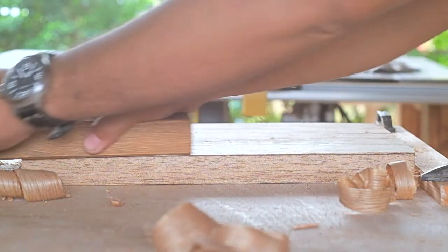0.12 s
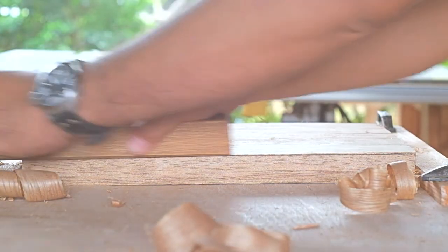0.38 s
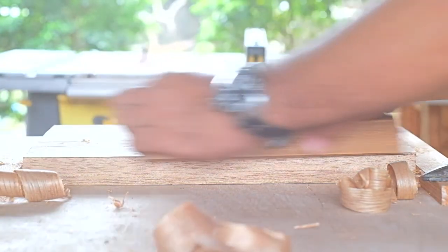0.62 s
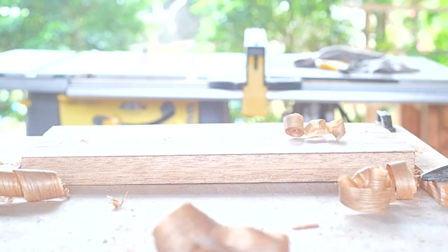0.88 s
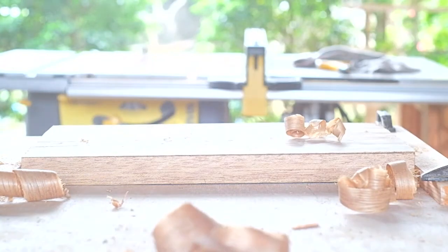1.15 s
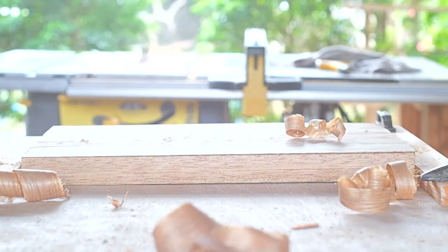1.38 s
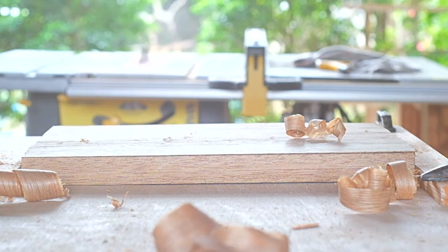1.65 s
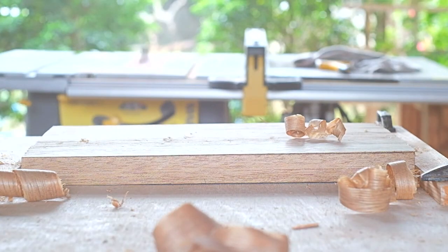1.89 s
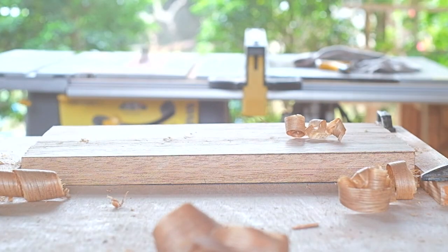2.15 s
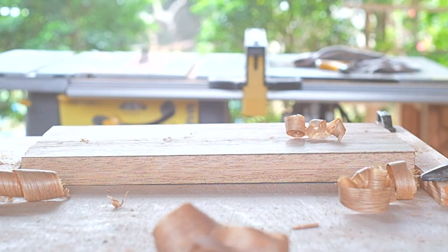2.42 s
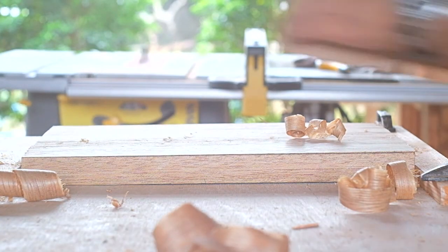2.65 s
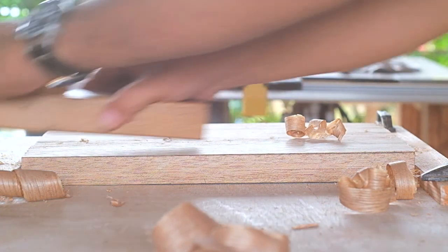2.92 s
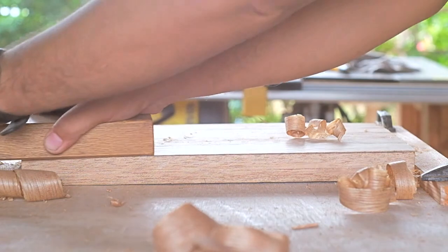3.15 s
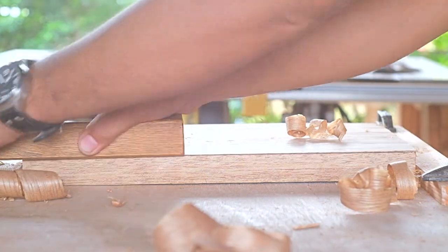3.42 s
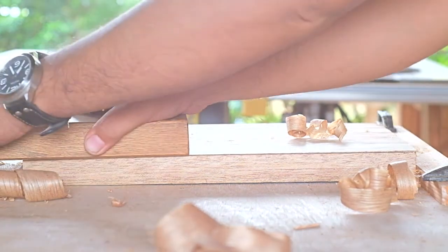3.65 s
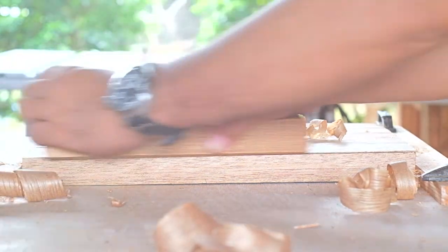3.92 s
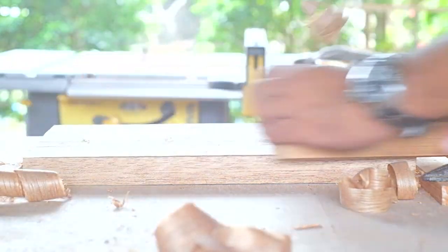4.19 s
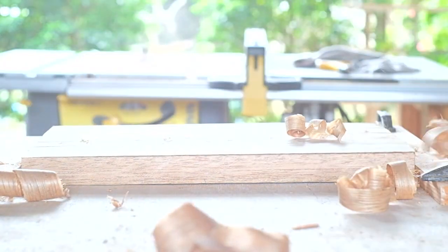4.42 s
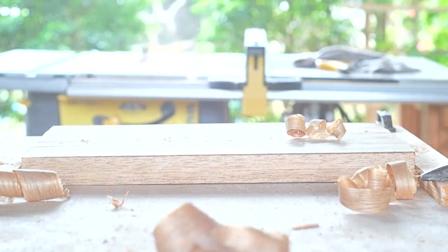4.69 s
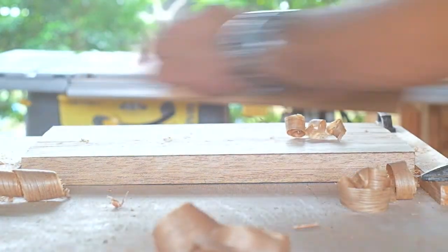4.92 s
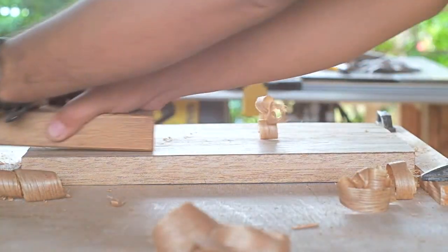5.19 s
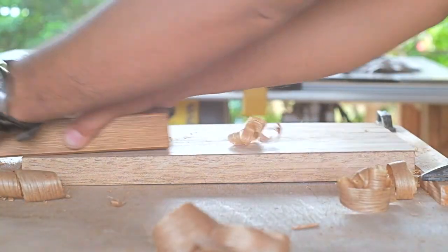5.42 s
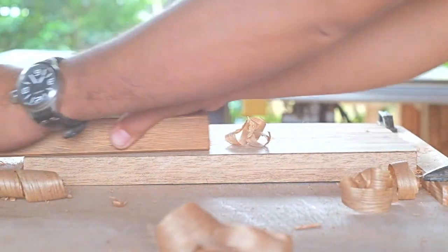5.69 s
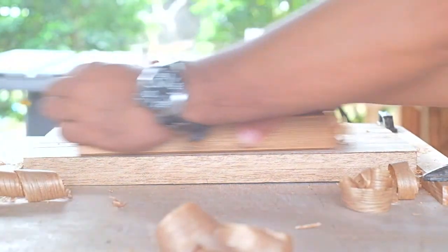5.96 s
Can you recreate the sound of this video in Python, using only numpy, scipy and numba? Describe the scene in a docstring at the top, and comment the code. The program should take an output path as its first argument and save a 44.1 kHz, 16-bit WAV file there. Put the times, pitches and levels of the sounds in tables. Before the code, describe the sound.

Close, slightly stereo pickup at an open-air workbench. A wooden plane lands with hollow knocks, then rasps along a board in a half-second stroke that brightens and ends in a crisp snap. A quiet pause of airy hiss follows. The plane lands again, shaves once more and clacks off, then a cluster of knocks and snaps leads into a third, more juddering push.

```python
"""Behind everything an open-air hiss sinks slowly, jumps back up at 3.06 s and drifts on to the end.
A wooden hand plane lands on a board with knocks (smooth pushes ringing board and bench) and snaps (tick modes).
In three pushes its blade tears fibres (noise slips through the plane's modes) while the sole judders and scuffs
(noise through the board and bench modes); more knocks and snaps mark landings and exits.
Faint treble swishes come from 1.06 s on, one thin beating ring (a sine) at 3.11 s."""
import sys
import numpy as np
from scipy import signal
from scipy.fft import rfft, irfft, next_fast_len
from scipy.io import wavfile
from scipy.ndimage import uniform_filter1d
from numba import njit

SR = 44100
rng = np.random.default_rng(int(sys.argv[2]) if len(sys.argv) > 2 else 0)


def waveform_to_disk(signal):
    """Save audio, clipped to [-1, 1], as 16-bit WAV at the path in sys.argv[1]."""
    frames = np.transpose(np.atleast_2d(signal))
    scaled = np.clip(frames, -1, 1) * 32767
    samples = np.round(scaled).astype(np.int16)
    wavfile.write(sys.argv[1], SR, samples)


def invert_db(x):
    """Field ratio 10**(x/20) for x, a level in decibels (scalar or array-like)."""
    u = np.asarray(x, float) / 20
    return 10 ** u


N = 267687
T = np.arange(N) / SR

# Pushes of the plane. Each row: blade bites in seconds, leaves the wood in seconds,
# tearing in dB and fizz in dB at the exit before the surge, factor on the plane's mode frequencies.
STROKES = [(0.328, 0.79, -20, -37.5, 0.93), (3.739, 4.272, -24, -37.5, 0.99),
           (5.672, 6.16, -26.5, -37, 0.97)]


def level(x):
    """Scale to rms 1."""
    return x / np.sqrt(np.mean(x ** 2))


def colour(x, points):
    """Shape the spectrum by (Hz, dB) points, linear in log frequency."""
    hz, db = np.transpose(points)
    size = next_fast_len(len(x) + 4096)
    f = np.maximum(np.arange(size // 2 + 1) * SR / size, 1)
    gain = invert_db(np.interp(np.log(f), np.log(hz), db))
    return irfft(rfft(x, size) * gain, size)[:len(x)]


@njit
def svf(x, hz, width_hz):
    """State-variable band-pass with a moving centre, gain 1 there."""
    y, band, low = np.empty(len(x)), 0., 0.
    for i in range(len(x)):
        g, k = np.tan(np.pi * hz[i] / SR), width_hz / hz[i]
        v = (band + g * (x[i] + 1e-18 - low)) / (1 + g * (g + k))
        band, low, y[i] = 2 * v - band, low + 2 * g * v, k * v
    return y


def walk(rate_hz):
    """Random levels held 1 / rate_hz seconds and slewed twice; spread near 1."""
    k = int(SR / rate_hz)
    steps = np.repeat(rng.standard_normal(N // k + 1), k)
    return level(uniform_filter1d(uniform_filter1d(steps, k), k)[:N])


def grains(scatter_db):
    """Dense slips of very uneven size, rms 1."""
    return level(rng.standard_normal(N) * invert_db(scatter_db * rng.exponential(size=N)))


def bench(force, low_hz=0, high_hz=SR):
    """Force rings the board and bench modes within a range; neighbours swing against each other."""
    # Each row: mode in Hz, gain in dB, t60 in seconds.
    modes = [(110.3, -14, 0.47), (141.6, -10.5, 0.41), (183.1, -5, 0.27), (216.2, -6.5, 0.35),
             (246, -4, 0.13), (307.5, -1.5, 0.17), (342, -2.5, 0.11), (385, -4.5, 0.15), (442, -8, 0.1),
             (507.7, -4, 0.15), (565, -8, 0.1), (636.4, -3.5, 0.086), (781, -8, 0.11), (855, -10.5, 0.07),
             (1010, -1, 0.027), (1227, -2.5, 0.011), (1382, -7.5, 0.028), (1580, -10.5, 0.026),
             (1780, -8, 0.021), (2160, -11, 0.017), (2543, -9, 0.007), (3310, -20, 0.019),
             (3970, -23.5, 0.0091)]
    out = 0
    for k, (hz, db, t60_s) in enumerate(modes):
        if low_hz <= hz < high_hz:
            r, w = np.exp(-np.log(1000) / (t60_s * SR)), 2 * np.pi * hz / SR
            mode = signal.lfilter([r * np.sin(w)], [1, -2 * r * np.cos(w), r * r], force)
            out = out + (-1) ** k * invert_db(db) * mode
    return out


def shaken(shake, size, low_hz, high_hz):
    """Modes within a range under a rough shake; size is the rms of the steady answer."""
    impulse = 1. * (np.arange(SR // 2) == 0)
    return bench(shake * size, low_hz, high_hz) / np.linalg.norm(bench(impulse, low_hz, high_hz))


def air():
    """Open-air hiss, alike at both ports in the bass and unrelated in the treble."""
    # Each row: frequency in Hz, density in dB per Hz.
    spectrum = [(20, -10), (35, -2.5), (60, -2.5), (105, -1.5), (230, -2), (600, -2.5), (1300, -3),
                (2300, -8.5), (4000, -18), (6000, -21), (9300, -28.5), (12000, -36), (15500, -48)]
    # Side against mid. Each row: frequency in Hz, gain in dB.
    side_gain = [(60, -14), (110, -12), (200, -9), (380, -11.5), (700, -11), (1290, -9.5), (2380, -3.5),
                 (4400, 1), (8120, 0), (15000, 0)]
    # Each row: time in seconds, mid level in dB.
    course = [(0, -40), (1.101, -41), (2.25, -48.5), (3.061, -55), (3.061, -41.5), (3.6, -39.5),
              (5.2, -43.5), (6.07, -35.5)]
    s, db = np.transpose(course)
    mid, side = (colour(rng.standard_normal(N), spectrum) for _ in range(2))
    both = mid + colour(side, side_gain) * np.array([[1], [-1]])
    return both / np.std(mid) * invert_db(np.interp(T, s, db) + 0.17 * walk(7.6))


def knocks():
    """Wood on wood: a smooth push is heard as an up-down swing and rings the modes; bench and board shudder on."""
    # Each row: start in seconds, swing peak in dB, contact in ms, bench and board shudder rms in dB.
    hits = [(0.031, -6.5, 1.93, -31, -18.5), (0.0403, -8.5, 1.67, -41, -44),
            (0.1306, -4.5, 3.23, -16, -19.5), (0.789, -7.5, 2.8, -18, -21.5), (.837, -52, 2.4, -39, -17),
            (3.0881, -3, 3.16, -17, -18), (3.201, -13, 2.5, -31.5, -30), (3.416, -18.5, 3.4, -25.5, -35),
            (3.585, -25, 2, -50, -34.5), (3.759, -22, 2.9, -44, -29.5), (4.089, -12.5, 2.45, -19, -21),
            (4.265, -9, 2.3, -19, -21), (4.322, -15, 2.2, -24.5, -28), (5.207, -10, 2.5, -26, -22.5),
            (5.261, -4.5, 3, -37, -36), (5.31, -20, 2.3, -51, -41), (5.411, -14, 3.2, -28, -22.5),
            (5.422, -6.5, 2.56, -24, -22.5), (5.435, -14, 2.1, -31, -21), (5.502, -11.5, 3.3, -31, -49)]
    bench_t60_s, board_t60_s, split_hz = 0.27, 0.21, 420
    push, swing, low, high = np.zeros((4, N + SR))
    shake, t = grains(scatter_db=2.5), T[:SR // 2]
    for s, db, ms, bench_db, board_db in hits:
        i, n = int(s * SR), int(max(ms, .5) * SR / 1000)
        blow = np.hanning(n)
        push[i:i + n] += invert_db(db) * blow / blow.sum()
        swing[i:i + n] += invert_db(db) * np.gradient(blow) * n / np.pi
        low[i:i + len(t)] += invert_db(bench_db - 60 * t / bench_t60_s)
        high[i:i + len(t)] += invert_db(board_db - 60 * t / board_t60_s)
    bench_shudder = shaken(shake, low[:N], 0, split_hz)
    board_shudder = shaken(shake, high[:N], split_hz, SR)
    return swing[:N] + invert_db(-12) * bench(push[:N]) + bench_shudder + board_shudder


def snaps():
    """A hard tick of a few cycles in each of several short modes, struck anew each time."""
    # Each row: start in seconds, peak in dB, tilt in dB per octave about 2500 Hz.
    ticks = [(0.031, -15.5, -27), (0.1306, -14.5, -16), (.433, -18, -3), (.852, -2, 4), (3.088, -22, 7),
             (3.416, -28, 4), (3.585, -22, 11), (4.338, -1.5, -1.8), (5.208, -39, 2), (5.2584, -7, -1.5),
             (5.4088, -10, -1), (5.4334, -7, -4), (5.4945, -21.5, 3.5), (5.798, -28, .2)]
    # Each row: mode in Hz, gain in dB before the tilt.
    modes = [(1500, 2), (2050, 5), (2500, 1.5), (3000, 2.5), (3500, 1.5), (4100, -1.5), (4800, -13),
             (5600, -14), (7000, -24.5), (9000, -31)]
    t60_s, attack_s = 0.013, 0.00072
    out, t = np.zeros(N + SR), T[:SR // 20]
    hz, mode_db = np.transpose(modes)
    chance = rng.standard_normal((len(ticks), 2, len(modes)))
    fade = np.exp(-np.log(1000) * t / t60_s) * np.clip(t / attack_s, 0, 1)
    for (s, db, tilt_db), (detune, vary) in zip(ticks, chance):
        gains = invert_db(mode_db + tilt_db * np.log2(hz / 2500) + 1.5 * vary) * (-1) ** np.arange(len(hz))
        tick = fade * (gains @ np.sin(2 * np.pi * np.outer(hz * (1 + 0.028 * detune), t)))
        i = int(s * SR)
        out[i:i + len(t)] += invert_db(db) * tick / np.abs(tick).max()
    return out[:N]


def pushing():
    """Stroke index, progress (0-1), gate, and the shallow start and last surge in dB."""
    onset_s, exit_s = 0.042, 0.0016  # gate opens ahead of the bite, closes after the exit
    bite_db, bite_s = -11, 0.09  # the edge starts shallow and digs in
    surge_db, surge_s = 8.5, 0.09  # the last fibres break out brighter
    bite, leave = np.transpose(STROKES)[:2]
    stroke = np.searchsorted(bite[1:] - .1, T)
    since, until = T - bite[stroke], leave[stroke] - T
    gate = np.clip(np.minimum(1 + since / onset_s, 1 + until / exit_s), 0, 1)
    along = np.clip(since / (since + until), 0, 1)
    shallow_db = bite_db * np.exp(-np.maximum(since, 0) / bite_s)
    return stroke, along, gate, shallow_db, surge_db * np.exp(-np.abs(until) / surge_s)


def blade():
    """Fibres tear in dense slips; the plane's modes flare and wander as grip and shaving change.
    Slips lie all along the edge, so the sum and the difference of the ports hear unrelated ones."""
    # The plane rings differently with each grip.
    # Each row: mode in Hz before the stroke's factor, width in Hz, gain in dB in each of the three strokes.
    plane = [(1030, 1140, -3.5, -5, 0), (1393, 240, 2, 1.5, -4), (1890, 150, 1, 3, -5),
             (2335, 160, -2.5, 1, 7.5), (3050, 330, -7.5, 0.5, -19), (3960, 59, -17, -4, -11),
             (4380, 110, -18, -10, -15), (5800, 430, -27, -22, -18)]
    # Both: each row: frequency in Hz, gain in dB.
    tear_colour = [(400, -34), (800, -7), (1300, 0.5), (2400, 5.5), (3300, 1.5), (4500, -10.5), (6200, -26)]
    fizz_colour = [(3400, 8), (4900, 4.5), (6500, -0.5), (8000, -8), (10500, -11), (13000, -26),
                   (15500, -52)]
    tear_grows_db, fizz_grows_db = 11, 6  # bite to exit, as the plane gathers speed
    fizz_bite_hz, fizz_exit_hz = 4860, 8000
    glide = 0.016  # the modes rise by this share over a stroke
    hang_db, hang_s = -10.5, 0.0638  # the shaving hangs on and rustles until it snaps off

    stroke, along, gate, bite_db, surge_db = pushing()
    tear_db, fizz_db, shift = np.transpose(STROKES)[2:, stroke]
    tear_db = tear_db - tear_grows_db * (1 - along) + bite_db + 0.28 * surge_db
    fizz_db = fizz_db - fizz_grows_db * (1 - along) + 0.61 * bite_db + surge_db
    for _, leave, *_ in STROKES:
        gate = gate + invert_db(hang_db) * ((T > leave) & (T < leave + hang_s))
    fizz_hz = fizz_bite_hz + (fizz_exit_hz - fizz_bite_hz) * along
    shift = shift * (1 + glide * along)
    chatter = invert_db(0.81 * walk(45))
    modes = []
    for hz, width_hz, *db in plane:
        gain = invert_db(np.array(db)[stroke] + 3.8 * walk(18))
        modes.append((gain, hz * shift * (1 + 0.022 * walk(12)), 1. * width_hz))
    out = []
    for _ in range(2):
        slips = chatter * grains(scatter_db=2.0)
        rung = sum(gain * level(svf(svf(slips, hz, 12 * w), hz, w)) for gain, hz, w in modes)
        tear = level(level(rung) + invert_db(-3.5) * level(colour(slips, tear_colour)))
        fizz = level(svf(colour(slips, fizz_colour), fizz_hz, 13500.0))
        out.append(gate * (invert_db(tear_db) * tear + invert_db(fizz_db) * fizz))
    return out


def sole():
    """Stick-slip of the sole shakes bench and board in uneven bursts; its judder climbs with speed."""
    # Each row, one per stroke: low, middle, upper modes in dB at the exit.
    at_exit_db = [(-35.5, -24.5, -21), (-38, -29, -23.5), (-29.5, -23.5, -20)]
    # Extra scuffs at bites, during a stroke and between strokes.
    # Each row: full level at in seconds, hold in seconds, low, middle, upper modes in dB.
    scuffs = [(0.33, 0.016, -35, -35.5, -49), (0.842, 0.082, -32, -26.5, -27.5),
              (3.575, 0.012, -36, -48, -41.5), (3.748, 0.021, -30, -30, -47), (4.32, 0.1, -27.5, -30, -26),
              (5.26, 0.046, -22, -33.5, -31), (5.429, 0.1, -26.5, -35.5, -33), (5.636, .02, -32, -31, -39),
              (5.783, .05, -42, -29.5, -37.5)]
    # Each row, one per stroke: Hz at the bite, Hz at the exit, level in dB before judder_grows_db * (2 - along).
    judders = [(467, 1500, -34), (480, 1050, -54), (490, 670, -14)]
    grows_db, edges_hz = (-1.5, 9.5, 20.5), [0, 420, 720, SR]  # low, middle, upper modes
    attack_s, t60_s = .015, 0.36  # scuffs
    judder_width_hz, judder_grows_db = 660.0, 10.5

    stroke, along, gate, bite_db, _ = pushing()
    sizes = []
    for exit_db, grow_db in zip(np.transpose(at_exit_db), grows_db):
        size_db = exit_db[stroke] - grow_db * (1 - along) + bite_db + 1.16 * walk(20)
        sizes.append(gate * invert_db(size_db))
    for s, hold_s, *levels_db in scuffs:
        fade = np.exp(-np.log(1000) * np.maximum(T - s - hold_s, 0) / t60_s)
        shape = np.clip(1 + (T - s) / attack_s, 0, 1) * fade
        sizes = [np.hypot(size, invert_db(db) * shape) for size, db in zip(sizes, levels_db)]
    even = grains(scatter_db=2.0)
    slips = level(even * invert_db(2.1 * walk(80)))
    from_hz, to_hz, db = np.transpose(judders)[:, stroke]
    hz = from_hz * (to_hz / from_hz) ** along
    narrow = svf(svf(even, hz, judder_width_hz), hz, judder_width_hz)
    judder = level(bench(narrow, 250)) * gate * invert_db(db - judder_grows_db * (2 - along) + bite_db)
    return judder + sum(shaken(slips, size, lo, hi) for size, lo, hi in zip(sizes, edges_hz, edges_hz[1:]))


def swishes():
    """Short smooth puffs of band-passed treble noise."""
    # Each row: centre in seconds, level in dB, pitch in Hz, length between 1/e points in seconds.
    puffs = [(1.06, -57, 8000, 0.018), (1.964, -62, 8000, .04), (3.417, -57, 10000, 0.023),
             (4.847, -60, 7950, 0.052), (5.075, -54.5, 9100, 0.04)]
    noise, out = rng.standard_normal(N), 0
    for s, db, hz, length_s in puffs:
        shape = np.exp(-((T - s) / (length_s / 2)) ** 2)
        out = out + invert_db(db) * shape * level(svf(noise, np.full(N, 1. * hz), 4000.))
    return out


def ring():
    """A thin sine after one landing; its amplitude beats, as close partials do, while it fades."""
    # Each row: start in seconds, approximate peak in dB, pitch in Hz, t60 in seconds, beats per second.
    tones = [(3.108, -30, 2500, .22, 80)]
    out = 0
    for s, db, hz, t60_s, beat_hz in tones:
        t = np.maximum(T - s, 0)
        beat = .65 - 0.43 * np.cos(2 * np.pi * beat_hz * t)
        out = out + invert_db(db) * np.exp(-np.log(1000) * t / t60_s) * np.sin(2 * np.pi * hz * t) * beat
    return out


def scene():
    """Near sounds reach two ports directly and by short reflections off bench and hands, unlike left and right."""
    # Side against mid. Each row: frequency in Hz, gain in dB.
    near_side = [(60, -17), (110, -24), (200, -19), (380, -15.5), (700, -15.5), (1290, -8), (2380, -5),
                 (4400, -2.5), (8120, 0), (15000, -2)]
    # Each row: frequency in Hz, left over right in dB.
    balance = [(100, 1.5), (1500, 1.05), (5000, 1.2), (8000, 0.2), (13000, -2)]
    cut, cut_side = blade()
    rest = sole() + knocks() + snaps() + ring() + swishes()
    # small wooden parts radiate no deep bass
    rest = signal.sosfilt(signal.butter(2, 90, "high", fs=SR, output="sos"), rest)
    t = T[:SR // 10]
    scatter = rng.standard_normal(len(t)) * np.exp(-np.log(1000) * t / 0.053)  # t60 in seconds
    reflected = signal.fftconvolve(rest, scatter / np.linalg.norm(scatter))[:N]
    side = colour(cut_side + reflected, near_side)
    both = cut + rest + side * np.array([[1], [-1]]) + air()
    return np.array([colour(port, [(hz, sign * db / 2) for hz, db in balance])
                     for port, sign in zip(both, (1, -1))])


@njit
def follow(x, fall):
    """Peak level that jumps up at once and sinks slowly."""
    y, e = np.empty(len(x)), 1e-9
    for i in range(len(x)):
        e = max(x[i], e * fall)
        y[i] = e
    return y


def roll_off(x):
    """The treble ends steeply here."""
    return signal.sosfilt(signal.butter(12, 15620, fs=SR, output="sos"), x)


def record(dry):
    """A compressor turns down briefly after loud peaks, then tanh rounds them."""
    limit_db, ratio, release_s = -10.5, 1.74, 0.038
    peak = follow(np.abs(dry).max(axis=0), np.exp(-1 / (release_s * SR)))
    gain = np.minimum(invert_db(limit_db) / peak, 1) ** (1 - 1 / ratio)
    gain = signal.lfilter([.006], [1, -.994], gain)  # about 4 ms, rising from zero
    return roll_off(np.tanh(0.79 * dry * gain) / 0.81)


dry = scene()
out = record(dry)
waveform_to_disk(out)
```